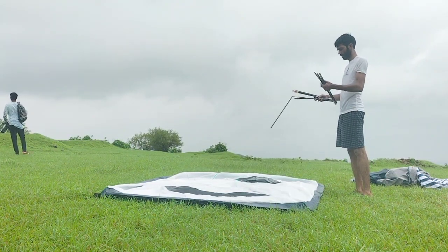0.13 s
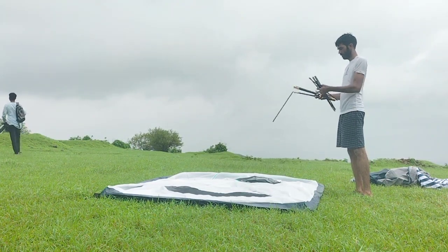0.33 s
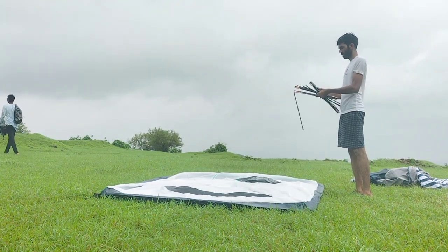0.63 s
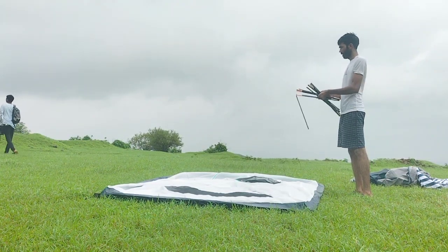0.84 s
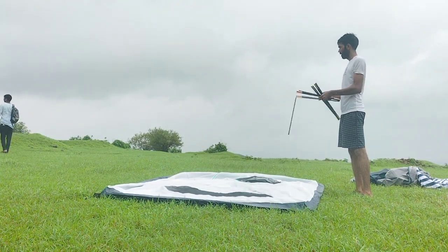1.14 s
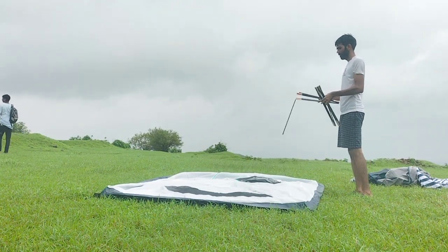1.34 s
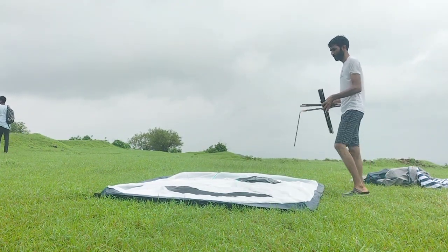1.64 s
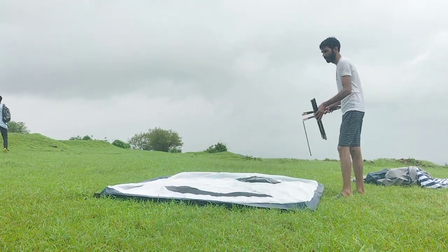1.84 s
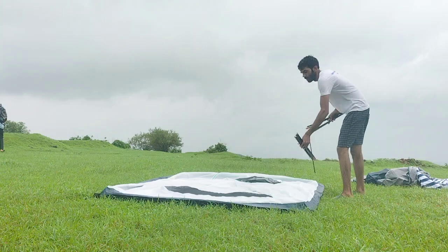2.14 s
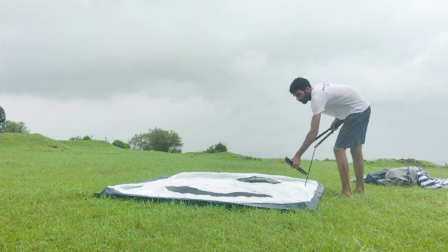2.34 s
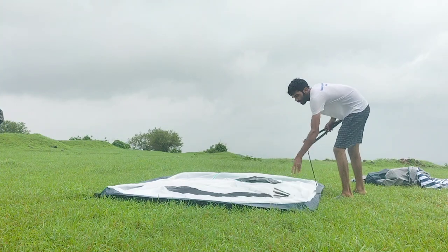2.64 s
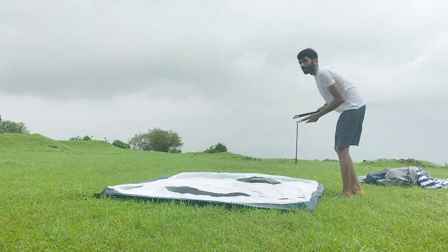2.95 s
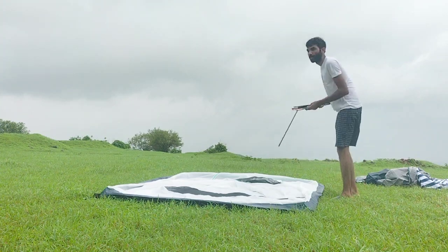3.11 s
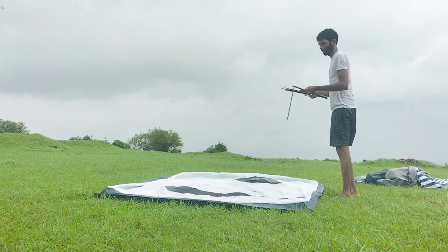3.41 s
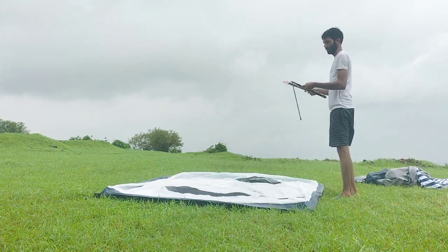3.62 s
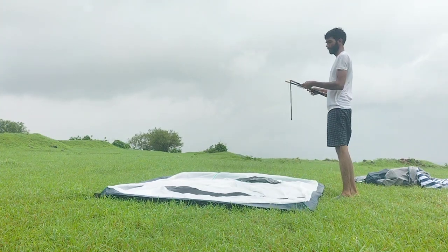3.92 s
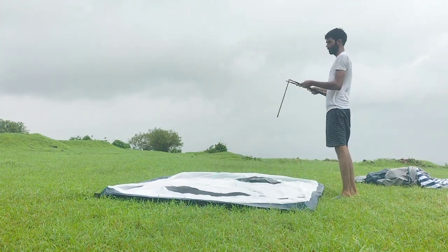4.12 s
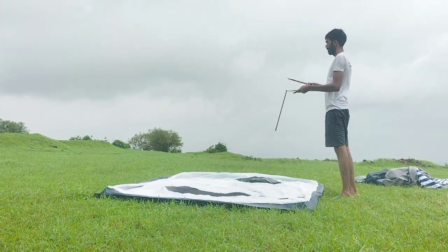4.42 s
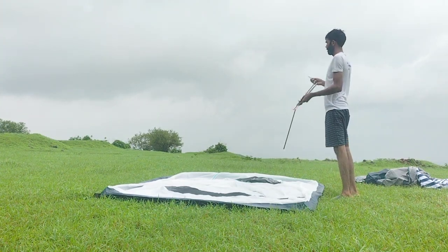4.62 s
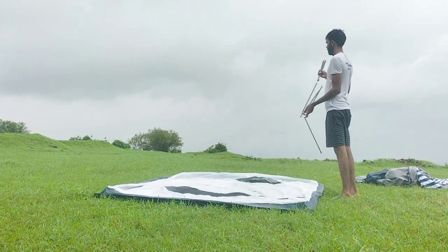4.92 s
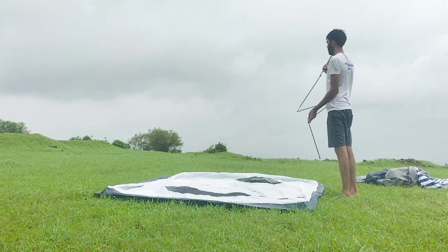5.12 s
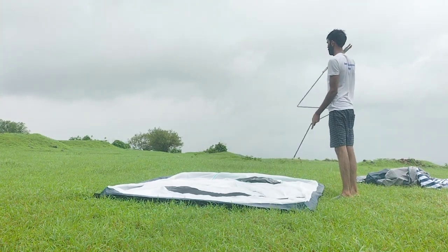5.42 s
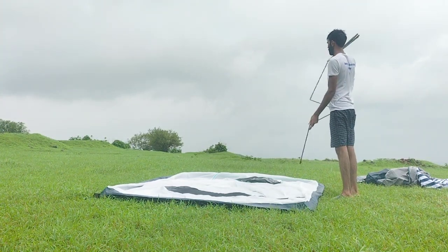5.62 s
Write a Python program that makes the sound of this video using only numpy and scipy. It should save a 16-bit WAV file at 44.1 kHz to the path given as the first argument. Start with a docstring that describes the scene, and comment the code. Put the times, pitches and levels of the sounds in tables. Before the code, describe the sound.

Close, dry clicks and metallic rattles of thin poles outdoors, with a deep wind buffet, one hollow crack and faint birdsong near the end.

```python
"""Folding tent poles are handled on an open meadow: sections tick and chatter against each other,
one rattles home in its metal sleeve, and joints snap shut. Short scrapes set the tube, sleeve and
joint resonances ringing; shaped noise makes the faint brush of cloth. Pitch-swept noise and single
pulses make the wind that thumps on the microphone. A small bird twitters in gliding sine whistles
over open air, made of two coloured noises: a low rumble and a soft rush."""
import sys
import numpy as np
from scipy import signal
from scipy.fft import rfft, irfft
from scipy.io import wavfile
from scipy.ndimage import uniform_filter1d

SR = 44100
rng = np.random.default_rng(int(sys.argv[2]) if len(sys.argv) > 2 else 0)


def unload_audio(sound):
    """Save the sound as a 16-bit wav file, at the path given as the first command line argument."""
    columns = np.transpose(np.atleast_2d(sound))
    # keep every value between -1 and 1, then stretch to whole-number steps
    steps = np.round(np.clip(columns, -1, 1) * 32767)
    wavfile.write(sys.argv[1], SR, steps.astype(np.int16))


N = 254016
T = np.arange(N) / SR


def from_db(db):
    """Decibels to gain."""
    return 10 ** (np.asarray(db) / 20)


def rms_one(x):
    """Scale to an rms of 1."""
    return x / np.sqrt(np.mean(x ** 2) + 1e-20)


def in_time(rows):
    """Read each column of a curve at every sample."""
    s, *columns = np.transpose(rows)
    return [np.interp(T, s, column) for column in columns]


def add(out, s, sound):
    """Mix a sound in, starting at time s."""
    at = max(0, round(s * SR))
    out[at:at + len(sound)] += sound[:max(0, N - at)]


def coloured_noise(spectrum):
    """Steady noise with the given spectrum, rms 1."""
    hz, db = np.transpose(spectrum)
    log_hz = np.log(np.fft.rfftfreq(N, 1 / SR) + 1)
    gain = from_db(np.interp(log_hz, np.log(hz), db))
    return rms_one(irfft(rfft(rng.standard_normal(N)) * gain, N))


def drift(rate):
    """Random wander through `rate` knots per second, rms 1."""
    knots = rng.standard_normal(int(N / SR * rate) + 2)
    return rms_one(np.interp(T * rate, np.arange(len(knots)), knots))


def ring(modes, uneven_db=0, pitch=1, order=2, size=4096):
    """Answer of a body to one click, at a fixed energy; each striking point weights the modes differently."""
    f = np.fft.rfftfreq(size, 1 / SR)
    power = 0
    for hz, width, db in modes:
        level = from_db(db + uneven_db * rng.standard_normal())
        offset = (f - hz * pitch) / width
        power = power + level ** 2 / (1 + offset ** 2 * 2 / order) ** order
    # minimum phase: every mode starts at the touch and dies away
    cepstrum = irfft(np.log(power + 1e-12))
    cepstrum[0] = cepstrum[size // 2:] = 0
    out = irfft(np.exp(rfft(cepstrum)))
    return out / np.linalg.norm(out) * np.pi


def brighten(sound, tilt_db, pivot_hz=6000):
    """Small hard contacts lack the low modes, soft ones the high; the slope levels off above the pivot."""
    size = 2 * len(sound)
    hz = np.fft.rfftfreq(size, 1 / SR)
    octaves = np.log2(np.hypot(hz, pivot_hz / 10) / np.hypot(hz, pivot_hz))
    tilted = irfft(rfft(sound, size) * from_db(tilt_db * octaves))[:len(sound)]
    return rms_one(tilted) * np.std(sound)


GRAINS_PER_S = 700  # a sliding contact catches and slips unevenly


def scrape(decay_s, grain_db=0, size=4096, count=8):
    """A dying burst of tiny contacts that excites all pitches almost evenly; energy 1."""
    t = T[:size]
    catches = np.interp(t * GRAINS_PER_S, np.arange(size), rng.standard_normal(size))
    fade = np.exp(-t / max(decay_s, 1 / SR)) * from_db(grain_db * catches)
    force = rng.standard_normal(size) * fade
    # alternately flatten the spectrum and restore the fade
    for _ in range(count):
        flat = irfft(np.exp(1j * np.angle(rfft(force))))
        force = flat * fade ** (1 / count)
    return force / np.linalg.norm(force)


# open air, low rumble and distant rush: (frequency [Hz], density [dB per Hz])
RUMBLE_SPECTRUM = [(20, -11.5), (45, -12), (80, -5), (170, 0), (260, -1), (400, -4.5), (700, -14),
                   (1500, -24), (4000, -57)]
RUSH_SPECTRUM = [(300, -23), (750, -4), (1050, 2), (1400, 0.5), (2000, -7), (2700, -1), (3150, -7),
                 (3600, -3), (4100, -6), (4800, -18.5), (6800, -28.5), (8000, -40), (16000, -60)]
# their loudness before the trims: (time [s], rumble level [dB], rush level [dB])
AIR_LEVELS = [(0.0, -60.5, -62), (0.77, -57.5, -58.5), (1.54, -60, -63), (2.41, -58.5, -60),
              (3.53, -60, -63), (3.9, -58.5, -60.5), (4.96, -61, -62), (5.76, -60.5, -60)]


def open_air(rumble_trim_db=1.5, rush_trim_db=-0.38):
    """A low rumble and the distant rush of wind over grass: two noises with gently wandering levels."""
    rumble_db, rush_db = in_time(AIR_LEVELS)
    flutter_db = .5 * drift(14)
    rumble = from_db(rumble_db + rumble_trim_db + flutter_db) * coloured_noise(RUMBLE_SPECTRUM)
    rush = from_db(rush_db + rush_trim_db + flutter_db / 2) * coloured_noise(RUSH_SPECTRUM)
    return rumble + rush


# gusts on the microphone: (start [s], level before the port [dB], attack [s], hold [s], release [s])
GUSTS = [(2.30, -57, 0.037, 0.034, 0.049), (3.268, -50.5, 0.044, 0.0378, 0.029),
         (3.696, -20, .013, .064, 0.036), (3.866, -35.5, 0.0086, 0.013, 0.016),
         (4.12, -55, 0.038, 0.045, 0.0509), (5.14, -53, 0.048, 0.067, 0.049)]
CALM_DB = -68  # the breeze between gusts


def gust_pressure():
    """Each gust swells, holds and dies away above the calm breeze."""
    pressure = from_db(CALM_DB)
    for s, db, attack_s, hold_s, release_s in GUSTS:
        swell = np.clip((T - s) / attack_s, 0, 1)
        since_hold = np.maximum(T - s - attack_s - hold_s, 0)
        pressure = pressure + from_db(db) * swell * np.exp(-since_hold / release_s)
    return pressure


def air_pitch(law, pressure):
    """Air speed follows the root of the pressure, so stronger wind sounds higher."""
    still_hz, rise_hz = law
    return still_hz + rise_hz * np.sqrt(pressure)


def turbulence(cut_hz, low_share=.33, order=4):
    """Lumpy pressure noise: faster air sweeps the same eddies past at a higher pitch."""
    base_hz = 300  # top of the band before the sweep
    band = signal.butter(order, [base_hz * low_share, base_hz], "band", fs=SR, output="sos")
    flow = signal.hilbert(signal.sosfilt(band, rng.standard_normal(2 * N)))
    # even out the short-term loudness
    loudness = np.sqrt(uniform_filter1d(np.abs(flow) ** 2, size=900) + 1e-12)
    flow = rms_one(flow.real / loudness)
    position = SR / 10 + np.cumsum(cut_hz / base_hz * np.ones(N))
    return np.interp(position, np.arange(2 * N), flow)


# single eddies that pop on the microphone: (time [s], peak level before the port [dB])
EDDIES = [(2.585, -35), (3.117, -31), (3.333, -35), (3.511, -43.5), (3.732, -8), (3.742, -16.5),
          (3.767, -10), (3.874, -15), (5.182, -37.5)]
# pitch laws: (pitch in still air [Hz], pitch added at full scale [Hz])
TURBULENCE_HZ, EDDY_HZ = (107.97, 753), (78.4, 241)


def wind(eddy_cycles=0.51, port_hz=55):
    """Turbulence and single eddies press on the microphone port, which passes no deep bass."""
    eddies, cover = np.zeros(N), np.zeros(N)
    half_s = 1 / 20  # each pulse is centred on its time
    for s, db in EDDIES:
        cycles = (T[:SR // 10] - half_s) * air_pitch(EDDY_HZ, from_db(db))
        passing = 1 / np.cosh(cycles / eddy_cycles * 2)
        add(eddies, s - half_s, from_db(db) * np.cos(2 * np.pi * cycles) * passing)
        add(cover, s - half_s, passing)
    pressure = gust_pressure()
    # a large eddy displaces the small ones while it covers the port
    uncovered = np.clip(1 - cover, 0, 1)
    gusts = uncovered * pressure * turbulence(air_pitch(TURBULENCE_HZ, pressure))
    port = signal.butter(2, port_hz, "high", fs=SR, output="sos")
    return signal.sosfilt(port, eddies + gusts)


# resonances of the ringing pole tube: (frequency [Hz], width [Hz], level [dB])
TUBE = [(700, 1000, -19), (1320, 370, -14.5), (2050, 160, -12.5), (2300, 72, -8.5), (2520, 35, -8),
        (2470, 57, -5.5), (2720, 39, -6.5), (2823, 130, 1), (3580, 70, -5.5), (3620, 31, -2),
        (3720, 41, -5), (3680, 130, -9), (4080, 250, -4), (4192, 80, -19.5), (4600, 50, -12.5),
        (4825, 62, -3), (5390, 350, -13.5), (5360, 55, -13), (5600, 280, -11), (6560, 180, -18.5),
        (7010, 310, -19), (8100, 248, -23.5), (9010, 190, -21), (10250, 540, -26), (11380, 370, -26.5),
        (11800, 340, -21.5), (13210, 400, -33), (14500, 540, -28.5), (15500, 500, -46)]


def poles(contacts, uneven_db, grain_db):
    """Each contact scrapes briefly and sets the tube ringing."""
    out = np.zeros(N)
    for s, db, decay_s, tilt_db in contacts:
        sound = signal.fftconvolve(scrape(decay_s, grain_db), ring(TUBE, uneven_db))
        add(out, s, from_db(db) * brighten(sound, tilt_db))
    return out


STRAYS_PER_S, STRAY_DB = 1.2, -63.5
STRAY_DECAY_S, STRAY_TILT_DB = .003, 15  # tilt in dB per octave


def strays():
    """Faint touches at random moments while the bundle is handled."""
    times = rng.uniform(0, N / SR, round(STRAYS_PER_S * N / SR))
    return [(s, STRAY_DB, STRAY_DECAY_S, STRAY_TILT_DB) for s in times]


# loose sections chatter: (time [s], first level [dB], scrape decay [s], brightness [dB per octave],
# first gap [s], loss per touch [dB])
CHATTERS = [(.411, -42.5, 0.014, 4, .0165, 1.5), (0.571, -44.5, 0.0097, 17, 0.0096, 0),
            (1.251, -51.5, 0.0061, 11, 0.01, 1.5), (1.623, -36, .009, 10, 0.0084, 8),
            (2.7347, -34, 0.027, -1.5, 0.019, -3.5), (2.914, -42, 0.013, 4, .012, 0.5),
            (2.978, -43, 0.0065, 13, .012, 5.5)]
GAP_GROWTH = 1.8  # each gap over the one before, as the sections swing apart


def chatter():
    """Three touches each time: the gaps widen and the strength changes by a set step."""
    touches = []
    for s, db, decay_s, tilt_db, gap_s, loss_db in CHATTERS:
        for k in range(3):
            delay_s = gap_s * sum(GAP_GROWTH ** j for j in range(k))
            touches.append((s + delay_s, db - k * loss_db, decay_s, tilt_db))
    return touches


# a metal sleeve tapped on its rim: (time [s], level [dB])
PINGS = [(0.429, -59), (0.523, -49.5), (1.505, -43), (2.952, -47)]
# resonances of the sleeve's short ring: (frequency [Hz], width [Hz], level [dB])
SLEEVE = [(5500, 44, 3), (5780, 150, 5), (10000, 300, -30), (11700, 250, -18), (11900, 410, -10)]


def sleeves(tap_s=.001):
    """A tap on a sleeve's rim gives a tiny high ping."""
    out = np.zeros(N)
    for s, db in PINGS:
        add(out, s, from_db(db) * signal.fftconvolve(scrape(tap_s), ring(SLEEVE)))
    return out


# joints snapping shut in the hand: (time [s], level before the cut-off [dB], contact cut-off [Hz],
# pitch [ratio])
SNAPS = [(.9950, -27.5, 2130, 0.92), (2.2995, -36, 9000, 0.79), (4.4758, -37, 9000, 0.95),
         (4.4851, -14, 14000, 0.97), (4.596, -43, 6000, 0.64), (4.6385, -36, 4000, 0.58)]
# resonances of the joint, damped by the grip: (frequency before pitch [Hz], width [Hz], level [dB])
JOINT = [(420, 150, -3), (830, 150, -9.5), (1500, 170, 5.5), (1760, 146, 3.5), (2200, 170, -4.5),
         (3660, 196, -0.5), (4040, 260, -6), (5000, 100, -15), (5500, 310, -15), (5980, 140, -8),
         (6800, 460, -14.5), (8230, 300, -23), (9320, 200, -27), (10300, 700, -40), (12100, 650, -31),
         (15100, 540, -36)]


def joints(seat_s=.0009, scatter_db=-23, scatter_s=0.04):
    """A joint seats with one dry, hollow crack, duller when eased in; the ground scatters a little back."""
    out = np.zeros(N)
    for s, db, cut_hz, pitch in SNAPS:
        force = scrape(seat_s, count=20) + from_db(scatter_db) * scrape(scatter_s)
        contact = signal.butter(2, cut_hz, fs=SR, output="sos")
        force = signal.sosfilt(contact, force)
        add(out, s, from_db(db) * signal.fftconvolve(force, ring(JOINT, pitch=pitch, order=5)))
    return out


# light touches between sections: (time [s], level [dB], scrape decay [s], brightness [dB per octave])
TICKS = [(1.589, -58, .002, 29), (1.905, -40, 0.0057, -13), (2.2985, -51, 0.0032, 1),
         (3.883, -43, 0.0014, -4.5), (4.0076, -48.5, .0044, 8), (4.596, -47, 0.0035, -2),
         (4.639, -47, 0.0019, 1), (4.8726, -57, 0.0044, 5), (5.119, -40.5, 0.0071, -0.5)]


def ticks():
    """Single, chattering and stray touches ring the tube, each from its own striking point."""
    return poles(chatter() + TICKS + strays(), uneven_db=3, grain_db=2.5)


# cloth brushing as the arms move: (start [s], length [s], level before the grain [dB])
RUSTLES = [(1.84, 0.16, -86), (2.596, 0.25, -84), (3.04, 0.26, -90)]
# spectrum of the cloth: (frequency [Hz], density [dB per Hz])
CLOTH = [(3000, -14), (5500, -10.5), (8300, -4), (11800, -2.5), (13500, 0), (16000, -3)]


def rustle():
    """Cloth brushes in soft swells of grainy, airy noise."""
    swell = np.zeros(N)
    for s, length_s, db in RUSTLES:
        add(swell, s, from_db(db) * np.hanning(int(length_s * SR)))
    grain_db = 2.5 * drift(150)
    return swell * from_db(grain_db) * coloured_noise(CLOTH)


# a section enters its sleeve, catches, seats and settles: (time [s], level [dB], scrape decay [s],
# brightness [dB per octave])
RATTLE = [(2.8014, -17, 0.015, -1), (2.8147, -13, 0.012, 1), (2.8247, -8, 0.0036, 1),
          (2.8312, -17.5, 0.013, -3.5)]


def rattle():
    """A section rattles into its sleeve: strong scraping contacts ring the tube."""
    return poles(RATTLE, uneven_db=1, grain_db=1.5)


def whistle(length_s, start_hz, middle_hz, end_hz, waver=0.012):
    """Each note is a pure whistle that swells and fades along a quick, slightly wavering curved glide."""
    u = np.linspace(0, 1, max(8, int(length_s * SR)))
    curve = np.polyfit([0, .5, 1], [start_hz, middle_hz, end_hz], 2)
    hz = np.polyval(curve, u) * (1 + waver * drift(710)[:len(u)])
    return np.sin(np.pi * u) * np.sin(2 * np.pi * np.cumsum(hz) / SR)


# the bird's repeated phrase, chips then a flourish: (flourish time [s], flourish level [dB],
# chip level [dB], chip spacing [s])
PHRASES = [(4.601, -63, -70, .042), (4.997, -50.5, -61, .040), (5.391, -54.5, -66, .044),
           (5.798, -52, -61.5, 0.043)]
# a falling chip: (length [s], start pitch [Hz], middle pitch [Hz], end pitch [Hz])
CHIP = (0.023, 6900, 4820, 3720)
# a flourish of rising whistles and falling flicks: (delay [s], length [s], start pitch [Hz],
# middle pitch [Hz], end pitch [Hz], level in the flourish [dB])
FLOURISH = [(0, .021, 3400, 3704, 4740, 0.5), (0.015, .022, 4450, 4970, 5330, 0.5),
            (0.04, .012, 4900, 4110, 3700, -4), (.051, .015, 5360, 4130, 3400, -5.5)]
CHIP_FIRST_DB, CHIP_VARY_DB = -5, 2  # the opening chip tends softer; each varies at random


def bird(count=3):
    """Evenly spaced chips lead into the flourish, all sung as short gliding whistles."""
    out = np.zeros(N)
    for s, flourish_db, chip_db, spacing_s in PHRASES:
        for k in range(count):
            db = chip_db + CHIP_FIRST_DB * (k == 0) + CHIP_VARY_DB * rng.standard_normal()
            add(out, s - (count - k) * spacing_s, from_db(db) * whistle(*CHIP))
        for delay_s, *glide, db in FLOURISH:
            add(out, s + delay_s, from_db(flourish_db + db) * whistle(*glide))
    return out


def across_field(sound, echo_db=-9, echo_s=.02):
    """A distant call arrives with a faint smear from grass and bushes."""
    smear = signal.fftconvolve(sound, scrape(echo_s))[:N]
    return sound + from_db(echo_db) * smear


def scene():
    """The poles are close and dry, the bird is farther off."""
    tent = ticks() + sleeves() + joints() + rustle() + rattle()
    mix = open_air() + wind() + tent + across_field(bird())
    return mix[None]


CUTOFF_HZ = 15900


def record(dry):
    """The top is cut steeply by a low-pass filter."""
    low_pass = signal.ellip(10, .1, 80, CUTOFF_HZ, fs=SR, output="sos")
    return signal.sosfilt(low_pass, dry)


dry = scene()
out = record(dry)
unload_audio(out)
```